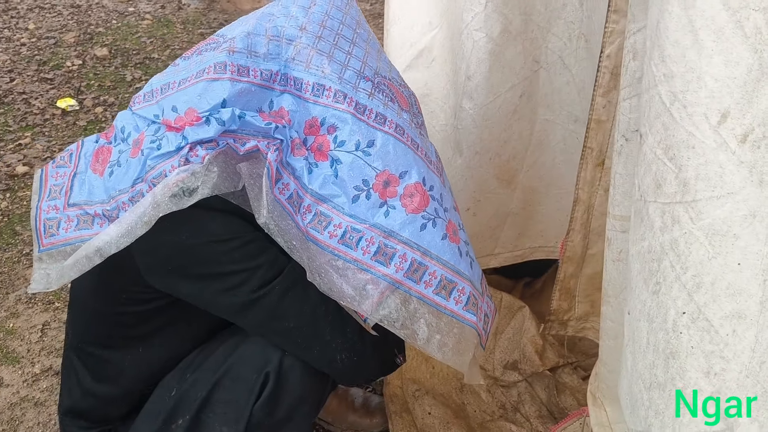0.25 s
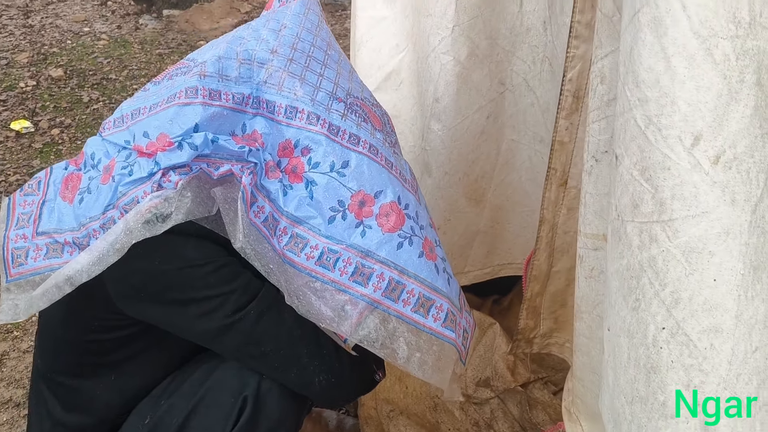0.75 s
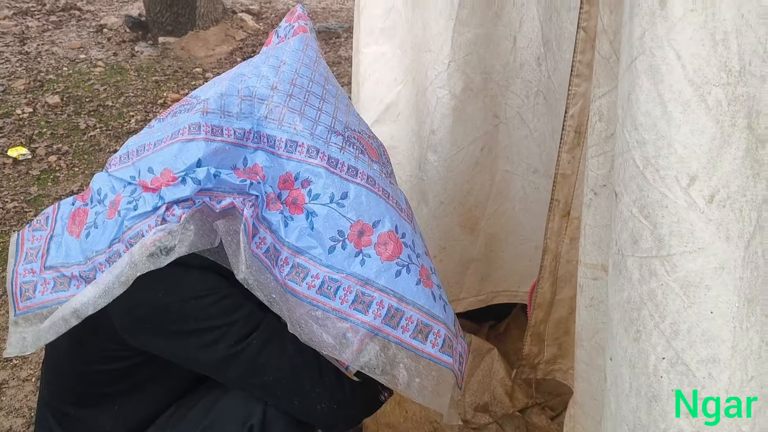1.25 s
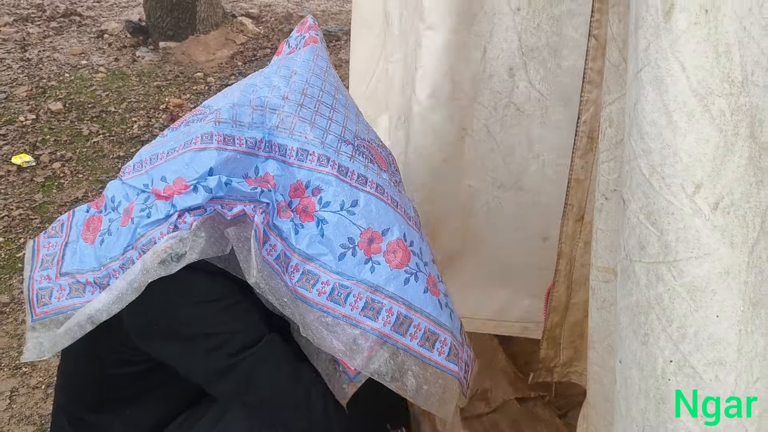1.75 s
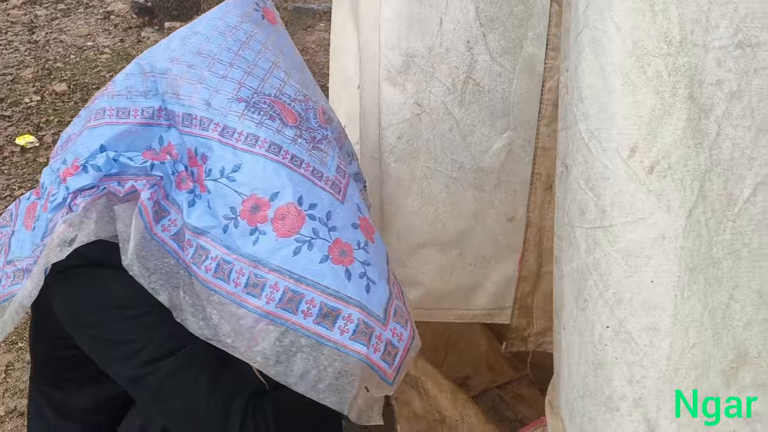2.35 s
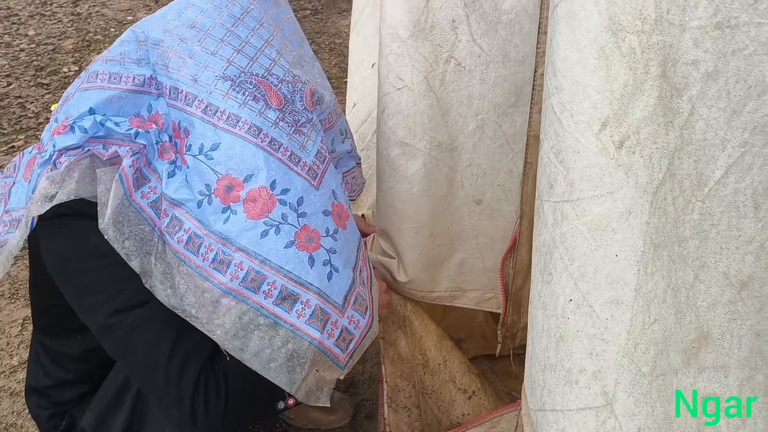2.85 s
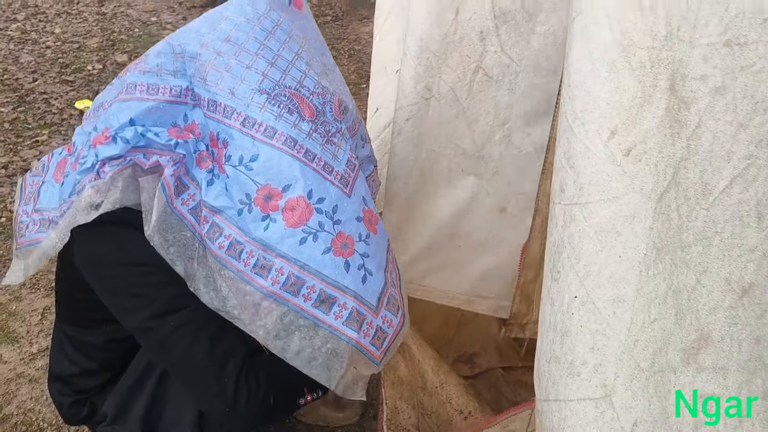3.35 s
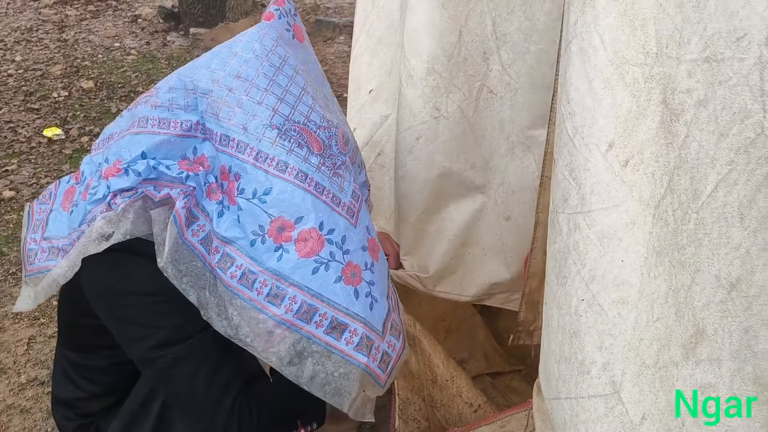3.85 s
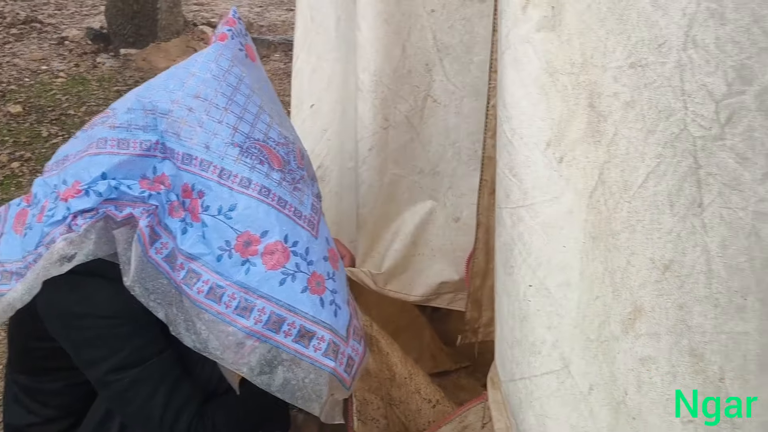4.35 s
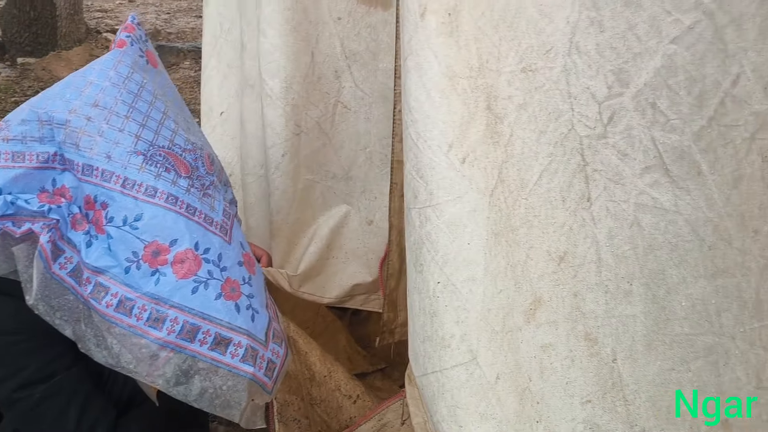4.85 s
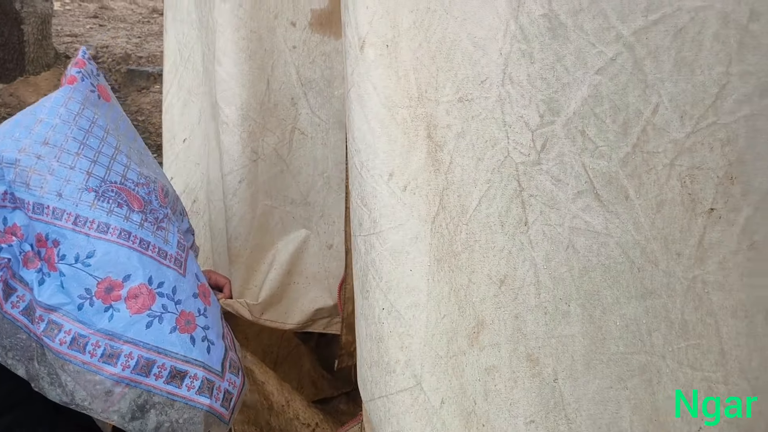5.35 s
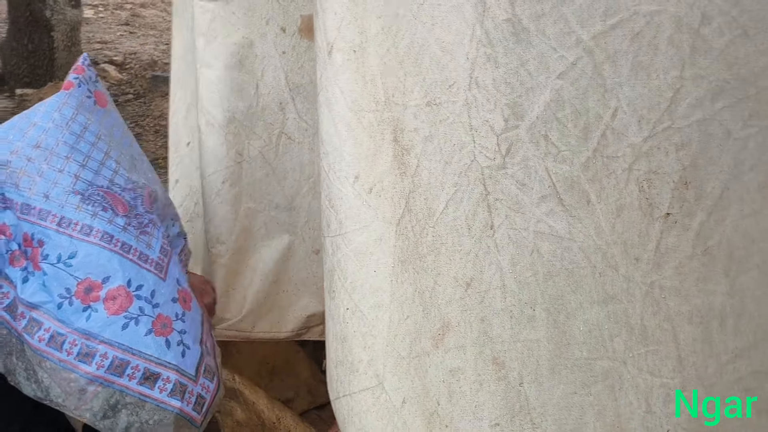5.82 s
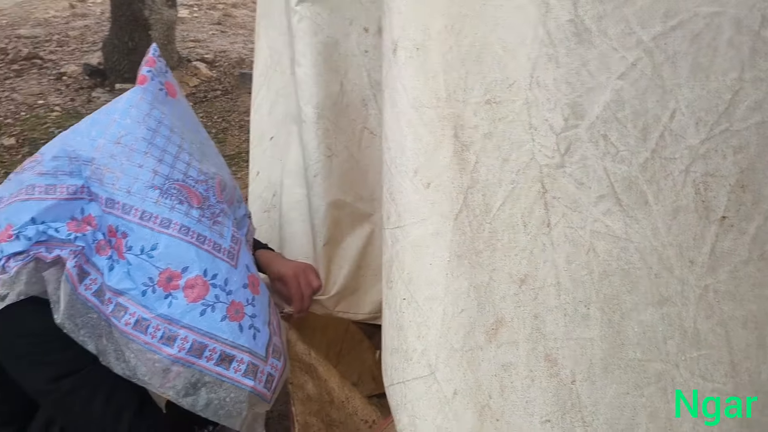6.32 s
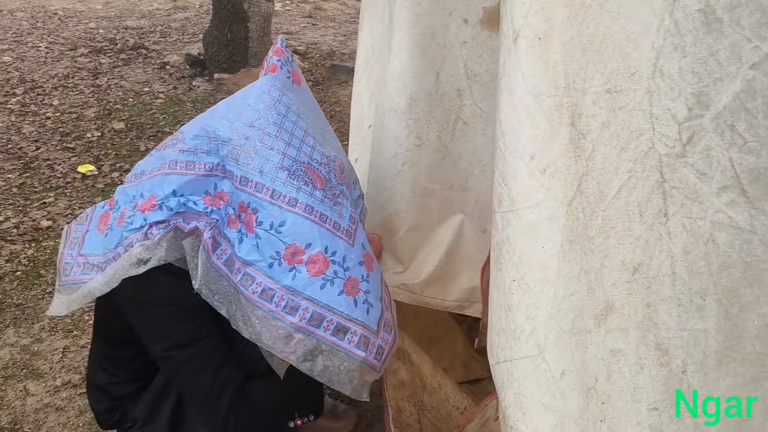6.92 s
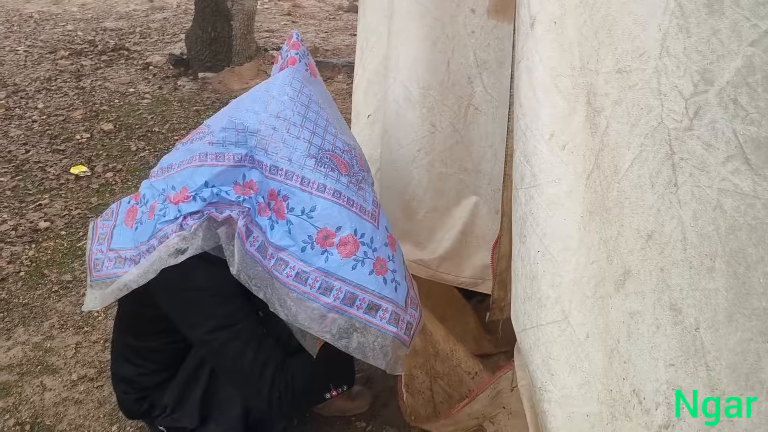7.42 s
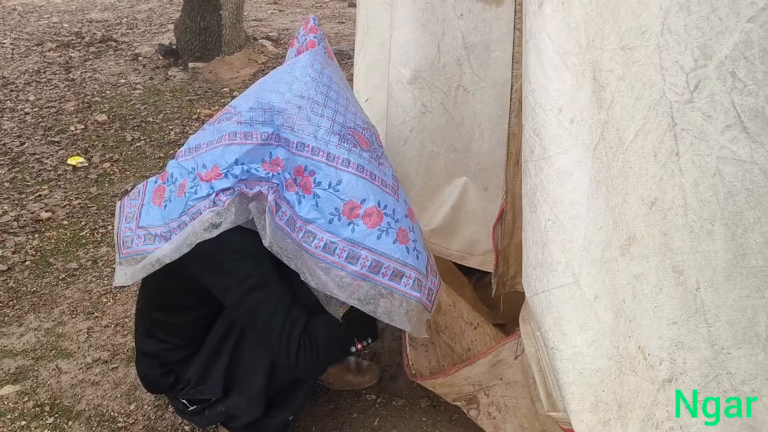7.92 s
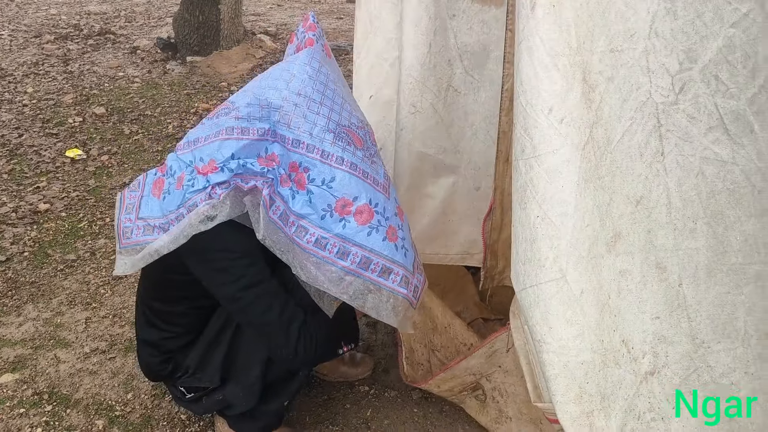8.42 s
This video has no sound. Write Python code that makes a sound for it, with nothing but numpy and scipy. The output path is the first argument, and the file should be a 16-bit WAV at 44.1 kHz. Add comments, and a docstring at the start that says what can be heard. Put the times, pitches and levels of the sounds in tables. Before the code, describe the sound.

Close, irregular raindrops tap on tent canvas and a plastic sheet over a fine patter, soft swishes and light wind.

```python
"""Rain on a canvas tent

Close under the canvas and a plastic sheet, on a microphone with two unlike ports. Heavy drops
thump the cloth and splash, others tick on the plastic, and small ones patter all around.
The sheet swishes as it slides, handled cloth rumbles, and rain hisses in the distance.
A few heavy drops boom low, and light wind buffets the microphone, both mostly on the left."""
import sys
import numpy as np
from scipy import signal
from scipy.fft import rfft, irfft
from scipy.io import wavfile

SR = 44100
rng = np.random.default_rng(int(sys.argv[2]) if len(sys.argv) > 2 else 0)


def to_wav(s):
    """Save 16-bit WAV."""
    ch = np.atleast_2d(s).T  # columns
    pcm = np.round(np.clip(ch, -1, 1) * 32767)  # PCM
    wavfile.write(sys.argv[1], SR, pcm.astype(np.int16))


N = 382788

# Heavy drops on the canvas, close to the microphone.
# start_s, thump_db, pitch_hz, snap_db, spray_db, pan_db (positive is left)
CANVAS_DROPS = [(0.069, -14.5, 306, -22, -33, 1.5), (0.2934, -30.5, 204, -38, -57, -1),
                (0.39, -25.5, 420, -30.5, -37, -1), (0.395, -26, 356, -41, -50, 2),
                (0.418, -38, 376, -25, -33, 8), (0.4281, -29, 380, -31, -43, -1),
                (0.5378, -25, 450, -37, -53, -2), (0.803, -32, 544, -32, -42, -2),
                (0.836, -30, 413, -31, -50, 0), (0.9134, -18, 472, -21.5, -34, 0),
                (0.926, -28.5, 186, -40, -24, 1.5), (1.0463, -15.5, 318, -21, -33, 1.5),
                (1.272, -18, 364, -37, -45, 1), (1.288, -27, 300, -30, -47, 3),
                (1.3172, -22.5, 300, -23.5, -43, -1.5), (1.4472, -26.5, 570, -30.5, -48, 3),
                (1.454, -27, 343, -42, -37, 1), (1.513, -31, 280, -48, -42, -1),
                (1.702, -13, 313, -22, -39, 4), (1.752, -29, 251, -43, -50, 2),
                (1.766, -16, 270, -24, -25.5, 10.5), (1.8419, -17.5, 395, -15, -38, 10),
                (1.8726, -13.5, 270, -18.5, -36, 8), (1.956, -12, 295, -18, -32.5, 6.5),
                (1.9634, -18.5, 409, -21.5, -45, 7), (2.073, -24.5, 360, -33, -41, 2),
                (2.1296, -25, 384, -25.5, -39, -3), (2.18, -10.5, 278, -25.5, -31, 2.5),
                (2.242, -35, 300, -34, -55, -4), (2.4159, -28, 473, -37, -55, 2),
                (2.6397, -29.5, 464, -35, -48, 1), (3.5175, -22, 434, -24, -34, -1.5),
                (3.6588, -21, 277, -24, -51, 0), (4.3429, -25, 372, -24.5, -28, 3.5),
                (4.6224, -11, 380, -20.5, -27, 3.5), (5.011, -28, 434, -36, -37, 1),
                (5.1898, -17, 305, -21.5, -31, 2), (5.2225, -25.5, 213, -21, -34, -1.5),
                (5.2282, -29, 203, -28, -39, 4), (5.2913, -24, 387, -20.5, -30, 5.5),
                (5.418, -28.5, 300, -44, -42, 0), (5.4692, -21.5, 480, -39, -39, 4),
                (5.6731, -31, 300, -30, -35, 5), (5.8589, -31, 350, -43, -44, -2),
                (6.0199, -11.5, 335, -20.5, -30, 2.5), (6.4418, -29, 400, -39, -40, -3),
                (6.592, -24, 282, -30.5, -44, 2), (7.0748, -27, 580, -29, -36, 4),
                (7.2006, -28, 231, -20.5, -32, 5), (7.332, -25.5, 291, -31.5, -39, -1),
                (7.6402, -23.5, 473, -55, -42, 2), (7.662, -35.5, 220, -36, -48, 12),
                (7.6962, -30, 275, -33, -37, 5), (7.951, -22, 288, -29.5, -40, 2),
                (8.5848, -32.5, 362, -31.5, -40, -1)]
def canvas_drops(rows=CANVAS_DROPS):
    """Drops thump the cloth and splash briefly; the knock's level follows both snap and thump."""
    return strike([(s, thump, hz, snap + 0.21 * (thump - snap) - 1.0, snap, spray, pan)
                   for s, thump, hz, snap, spray, pan in rows], splash_t60_s=0.0099)

# Soft pats on the same canvas. start_s, thump_db, pitch_hz, pan_db
SOFT_PATS = [(0.191, -27, 300, -1), (0.262, -31, 300, -1), (0.543, -28, 300, -2), (1.066, -28, 320, 4),
             (1.492, -25.5, 455, 3), (1.632, -27, 203, 1), (1.653, -23.5, 170, -1.5), (1.919, -33, 278, -2),
             (1.942, -22, 360, 0), (2.9411, -27, 373, 1), (2.946, -33, 403, 1), (2.969, -40, 400, -2),
             (2.983, -33, 129, 15), (3.067, -41, 150, 8), (3.212, -27, 525, 4), (3.2167, -25, 257, 1),
             (3.3682, -32.5, 400, -1), (3.7412, -20, 440, .5), (3.7464, -24.5, 300, 0),
             (4.5106, -30.5, 248, -1), (4.525, -28, 460, 4), (4.736, -33, 352, 2), (4.79, -35, 258, -1),
             (4.843, -32.5, 482, -3), (5.047, -37.5, 138, 14), (5.087, -35, 400, 1), (5.497, -32, 260, 0),
             (5.562, -36, 198, 2), (6.0288, -24.5, 330, -2), (6.1966, -33, 229, -1), (6.302, -38.5, 380, 2),
             (6.37, -35.5, 300, 0), (7.1514, -27.5, 357, 2), (7.597, -33, 350, 0), (7.6455, -27, 420, 0),
             (7.707, -29, 300, -2), (7.83, -38, 300, -2)]
def soft_pats():
    """Drops that swing the cloth with next to no splash."""
    return canvas_drops([(s, db, hz, db - 29.5, db - 28, pan) for s, db, hz, pan in SOFT_PATS])

# Drops on the plastic sheet nearby. start_s, knock_db, snap_db, spray_db, pan_db
SHEET_TICKS = [(0.44,-33,-28,-47,-2),(0.4845,-48,-21,-27,-10),(0.488,-50,-14.5,-24.5,1),(0.945,-40,-28,-48,-2),(1.005,-39,-51,-39,2),(1.732,-56,-44,-38,5),(1.789,-42,-38,-32,15),(1.809,-36,-21,-37,15),
               (2.101,-32,-27,-37,4),(2.873,-51,-28.5,-37,0),(3.126,-46,-30.5,-42,3),(3.276,-30.5,-46,-36,2),(3.93,-32,-31,-42,-4),
               (3.976,-61,-37,-36,10),(4.314,-44,-30,-39,0),(4.709,-34.5,-31,-46,-3),(5.181,-33,-33,-45,0),(5.2802,-30,-28,-42,0),(5.981,-40,-34,-35,0),
               (6.429,-48,-44,-37,4),(6.651,-42,-38,-33.5,3),(6.699,-30.5,-47,-42,2),(7.892,-33,-33,-45,-4.5),(8.152,-37,-40,-37.5,0),
               (8.265,-31.5,-32,-50,-2),(8.386,-56,-37,-40,0),(8.525,-33,-33,-53,4),(8.493,-40,-32,-50,-3),(.986,-50,-46,-31.5,10),(1.105,-48,-40,-34,3),(1.0276,-45,-36,-43,-2),(1.5892,-26,-22.5,-31,10),
               (2.2613,-53,-43,-35.5,12),(2.3074,-31.5,-34,-48,-1),(2.4498,-30,-32,-54,1),(2.517,-28,-30,-40,-2),
               (2.598,-33,-33,-56,12),(2.686,-36,-32,-30,4),(2.7263,-53,-50,-32.5,8),(2.9196,-52,-37,-29.5,4),
               (3.0158,-35,-34,-35,1),(3.066,-54,-28.5,-41,3),(3.2499,-32.5,-34.5,-50,-1),(3.259,-51,-39,-37,0),
               (3.3556,-35,-47,-34.5,15),(3.449,-31,-38,-33,5),(3.833,-31,-31,-47,-4),(3.9482,-31,-31.5,-48,-4),(4.077,-28.5,-30,-40,0),
               (4.1085,-33,-27.5,-35,2),(4.433,-32.5,-23.5,-33,1),(4.592,-30,-34,-48,3),(4.7626,-45,-32,-25,1),
               (4.7722,-34,-32,-37,5),(4.961,-31.5,-34,-47,-10),(5.1201,-32.5,-36,-42,-5),(5.3297,-30,-29,-42,5),
               (5.5853,-31.5,-36,-42,0),(5.65,-34,-32,-35,0),(5.6873,-35,-34,-44,3),(6.1362,-29,-31,-51,0),(6.3172,-56,-32,-36,5),
               (6.5051,-35,-33,-32,6),(6.52,-33,-38,-34,1),(6.925,-34,-41,-48,9),(7.069,-40,-28,-39,3),(7.081,-41,-31,-42,3),(7.143,-45,-40,-36.5,0),(7.2214,-34,-27.5,-44,2),(7.386,-50,-42,-39,2),(7.2766,-32,-37,-39,-3),
               (7.7828,-41,-29,-32,8),(8.188,-32.5,-32.5,-42,-4),(8.3687,-37,-40,-35,2),(8.4594,-47.5,-53,-27.5,6),
               (8.6193,-32,-48,-37.5,-5)]
def sheet_ticks(thump_hz=300):
    """On plastic a drop is nearly all splash, over a faint thump."""
    return strike([(s, knock - 11, thump_hz, knock, snap, spray, pan)
                   for s, knock, snap, spray, pan in SHEET_TICKS], splash_t60_s=0.015)

def strike(drops, splash_t60_s):
    """Each drop swings three membrane modes, alike at both ports, and splashes noise, unlike at each."""
    size = SR // 8
    t = np.arange(size) / SR
    click, left_right = (t == 0) * 1.0, np.array([[0.5], [-0.5]])
    dying = from_db(-60 * t / splash_t60_s) + 0.16 * from_db(-60 * t / 0.067)   # droplets trail after
    opening = 1 - np.exp(-t / (0.035 * splash_t60_s + 1e-5))
    crack = (3.0 - 120 * splash_t60_s) * np.array([0.7, 0.9, 1.4])[:, None, None]   # hard contact
    envelope = dying * opening + crack * from_db(-60 * t / 0.0013)
    thumps, splashes = np.zeros((2, N + size)), np.zeros((3, 2, N + size))
    for start_s, thump_db, hz, knock_db, snap_db, spray_db, pan_db in drops:
        at = slice(round(start_s * SR), round(start_s * SR) + size)
        cycles = 5.0 - 0.13 * max(thump_db, -40)   # hard blows damp themselves, soft pats ring on
        swing = 0.99 * ring(click, hz, t60_s=cycles / hz)
        swing += 0.22 * ring(click, 0.588 * hz, t60_s=0.067)
        swing += 0.5 * ring(click, 1.365 * hz, t60_s=0.47 * cycles / hz)
        # light drops and those with little splash land softer
        contact_hz = 3600 * from_db(0.12 * (thump_db + 15) + 0.25 * min(snap_db - thump_db, 0))
        swing = 1.18 * soften(soften(swing, contact_hz), contact_hz)
        thumps[:, at] += from_db(thump_db + left_right * pan_db) * swing
        splash = envelope * rng.standard_normal((3, 2, size)) + 2.0 * crack * click
        splash *= from_db(0.62 * left_right * pan_db)
        splashes[:, :, at] += from_db([knock_db, snap_db, spray_db])[:, None, None] * splash
    splashes[0] = 1.275 * band(splashes[0], 1080, 3260, order=1)   # the knock sits well above the thump
    rebound = band(soften(thumps, hz=2200), 44, 8000, order=1)   # open cloth radiates no steady push
    return (rebound + in_bands(splashes))[:, :N]

def patter(slide_db, band_levels_db=(-53.5, -55, -60.5)):
    """Small drops all around, as tiny bursts of noise; a sliding sheet crackles with them."""
    sharp = bursts(per_s=450, spread_db=2.8, t60_s=0.0036)   # these sound in all bands at once
    sides = from_db(3.33 * np.array([drift(27), drift(39)]))   # drops fall nearer one port or the other
    gates = []
    for db in band_levels_db:
        soft = bursts(per_s=400, spread_db=2.5, t60_s=0.0067)
        gates.append(from_db(db + 0.29 * slide_db) * (1.15 * sharp + 0.84 * soft))
    return in_bands([gate * sides * rng.standard_normal((2, N)) for gate in gates])

# The tent cloth is handled near the microphone. peak_s, level_db, rise_s, fall_s
CLOTH_MOVES = [(0.2, -49.5, 0.23, 0.11), (0.43, -41, 0.033, 0.027), (1.0, -46.5, 0.57, 0.17),
               (1.55, -39.5, 0.14, 0.22), (1.76, -32.5, 0.29, 0.24), (2.95, -46, 0.38, 0.12),
               (3.25, -46, 0.077, 0.093), (3.65, -45.5, 0.37, 0.25), (4.56, -43.5, 0.11, 0.3),
               (5.26, -41.5, 0.091, 0.31), (6.02, -43.5, 0.053, .12), (6.61, -44.5, .05, 0.058),
               (7.28, -42, 0.26, 0.14), (7.67, -39.5, 0.042, 0.056), (7.97, -43.5, 0.14, .08),
               (8.3, -45.5, 0.1, 0.42)]
def cloth_rumble(rest_db=-50.5):
    """Clumps of soft blows, denser and deeper when handled, each strike a few low canvas modes."""
    handled_db = swells(CLOTH_MOVES, rest_db) - rest_db
    blows = impacts(per_s=170 * from_db(3.0 * drift(23) + 0.6 * handled_db), spread_db=2.5)
    sides = from_db(rng.normal(0, 2.3, (2, N)))
    modes = np.zeros((2, N))
    for hz in np.geomspace(130, 950, 12):
        struck = blows * sides * (rng.random(N) < 0.3)
        modes += from_db(-0.3 * handled_db * np.log2(hz / 250)) * ring(struck, hz, t60_s=15.5 / hz)
    rumble = rms_one(band(soften(modes, hz=910), 300, 810, order=1))
    return from_db(rest_db + 0.68 * handled_db) * rumble   # denser blows add to this swell

# The plastic sheet slides, close by. peak_s, swish_db, fine_hiss_db, rise_s, fall_s
SHEET_SLIDES = [(.15,-48.5,-61,.25,0.23),(.42,-42,-48,0.059,0.049),(.85,-44,-50.5,0.23,0.12),(1.24,-40,-50,0.15,0.13),(1.54,-41.5,-56,0.067,0.26),
                (1.84,-49,-42,0.38,0.075),(3.5,-47,-56,0.17,0.15),(4.0,-51,-54,0.3,0.15),
                (5.02,-47,-46.5,0.046,0.053),(5.26,-51,-51.5,0.088,0.36),(6.02,-46,-53,0.068,0.04),(6.51,-60,-53,0.028,0.38),
                (7.69,-46,-49.5,0.033,0.033),(7.96,-52,-52,0.059,0.14),(8.47,-49,-52.5,0.22,0.33)]
def sheet_and_far_rain(far_rain_db=(-51, -49, -58)):
    """Flickering hiss of far rain that swells as the sheet slides; also gives the top band's rise in dB."""
    peak_s, swish_db, fine_db, rise_s, fall_s = np.transpose(SHEET_SLIDES)
    levels_db = [swells(zip(peak_s, db, rise_s, fall_s), rest_db)
                 for db, rest_db in zip([swish_db - 5, swish_db, fine_db], far_rain_db)]
    flicker_db = 1.6 * drift(22)
    noises = [from_db(db + flicker_db + 1.8 * drift(40)) * rng.standard_normal((2, N))
              for db in levels_db]
    return in_bands(noises), levels_db[2] - far_rain_db[2]

# Low swells: the boom of heavy drops on the canvas (short), and light wind on the microphone (long).
# peak_s, level_db, rise_s, fall_s
LOW_SWELLS = [(0.07, -37, 0.011, 0.021), (1.72, -50.5, 0.05, 0.29), (2.19, -44, 0.058, 0.06),
              (2.45, -42, 0.27, 0.19), (2.9, -41, 0.11, 0.41), (4.25, -43.5, 0.16, 0.42),
              (5.22, -44.5, 0.35, 0.2), (5.73, -44.5, .5, 0.29), (6.62, -38, .03, 0.037),
              (7.66, -40, 0.068, 0.039), (8.58, -43.5, 0.16, 0.13)]
def boom_and_wind(calm_db=-59.5):
    """Booming canvas and buffeting air: lumpy low noise, its own at each port, stronger on the left."""
    lumps = from_db(4.4 * np.array([drift(7.4), drift(13)]))
    low_noise = rms_one(lumps * band(rng.standard_normal((2, N)), 49, 132))
    return from_db(swells(LOW_SWELLS, calm_db) + np.array([[3.0], [-6.0]])) * low_noise

# The three bands of splash and hiss: knock, snap, spray. low_hz, high_hz
SPLASH_BANDS = [(700, 3500), (3500, 7800), (7800, 19000)]
def in_bands(parts, port_loss_db=(1, -1.5, 12)):
    """Confines three white signals to their bands, making up for what band and ports take away."""
    knock = parts[0] + 0.088 * parts[0][::-1]   # each port hears a little of the other's knock
    return sum(from_db(db) * np.sqrt(SR / 2 / (high - low)) * band(x, low, high, order=3)
               for x, (low, high), db in zip([knock, *parts[1:]], SPLASH_BANDS, port_loss_db))

def ring(clicks, hz, t60_s):
    """A click pushes a membrane mode out at once; it swings back and dies."""
    r, w = from_db(-60 / (t60_s * SR)), 2 * np.pi * hz / SR
    return signal.lfilter([1, -r * np.cos(w)], [1, -2 * r * np.cos(w), r * r], clicks + 1e-18)

def soften(x, hz):
    """One-pole low-pass: a soft contact."""
    r = np.exp(-2 * np.pi * hz / SR)
    return signal.lfilter([1 - r], [1, -r], x)

def impacts(per_s, spread_db):
    """Random clicks: many small, few large."""
    sizes = from_db(spread_db * np.minimum(rng.exponential(1, N), 3.0))
    return sizes * (rng.random(N) < per_s / SR)

def bursts(per_s, spread_db, t60_s):
    """Envelope of small drops, each a short decay; rms 1."""
    return rms_one(signal.lfilter([1], [1, -from_db(-60 / (t60_s * SR))], impacts(per_s, spread_db)))

def swells(rows, rest_db):
    """Level in dB over a resting floor; a swell gains 7.84 dB per rise_s and loses it per fall_s."""
    t = np.arange(0, N, 64) / SR
    power = from_db(2 * rest_db)
    for peak_s, db, rise_s, fall_s in rows:
        below_peak_db = 7.84 * np.maximum((peak_s - t) / rise_s, (t - peak_s) / fall_s)
        power = power + from_db(2 * (db - below_peak_db))
    return np.interp(np.arange(N) / SR, t, 10 * np.log10(power))

def drift(hz):
    """Slow random wander: noise through a double one-pole low-pass, rms 1."""
    step, settle = 40, 2000
    r = np.exp(-2 * np.pi * hz * step / SR)
    slow = signal.lfilter([1], [1, -2 * r, r * r], rng.standard_normal(N // step + settle + 2))[settle:]
    return np.interp(np.arange(N) / step, np.arange(len(slow)), rms_one(slow))

def band(x, low_hz, high_hz, order=2):
    """Butterworth band-pass."""
    return signal.sosfilt(signal.butter(order, [low_hz, high_hz], "band", fs=SR, output="sos"), x)

def from_db(db):
    """Gain of a level in dB."""
    return 10 ** (np.asarray(db) / 20)

def rms_one(x):
    """Scaled to rms 1."""
    return x / np.sqrt(np.mean(x ** 2) + 1e-20)

def scene():
    """Everything that arrives in front of the two ports."""
    drops = canvas_drops() + soft_pats() + sheet_ticks()
    hiss, slide_db = sheet_and_far_rain()
    return drops + patter(slide_db) + cloth_rumble() + hiss + boom_and_wind()

def port(x, response):
    """A microphone port colours the sound as a minimum-phase filter."""
    size = 4096
    hz = np.maximum(np.arange(size // 2 + 1) * SR / size, 1)
    points_hz, gains_db = np.transpose(response)
    curve_db = np.interp(np.log(hz), np.log(points_hz), gains_db)
    cepstrum = irfft(curve_db * np.log(10) / 20)
    cepstrum[1:size // 2] *= 2
    cepstrum[size // 2 + 1:] = 0
    return signal.fftconvolve(x, irfft(np.exp(rfft(cepstrum))))[:N]

# The microphone's ports, the left duller, the right brighter. frequency_hz, gain_db
LEFT_RESPONSE = [(40, -12), (90, 5.5), (700, 0.5), (1500, -4.5), (2400, -6.5), (5000, -5), (6500, -9),
                 (7000, -11.5), (7800, -12), (8300, -4), (8900, -11.5), (10800, -13.5), (13500, -15),
                 (15000, -14)]
RIGHT_RESPONSE = [(40, -15.5), (90, 5), (700, 0.5), (1700, 2.5), (3900, 3.5), (5200, 6.5), (6000, 6.5),
                  (6700, 4.5), (7300, -1.5), (8100, -12), (8900, -21.5), (10700, -10), (13500, -11.5),
                  (15000, -6)]
def record(dry):
    """Each port colours its side, the right hears a little later, and the top treble is cut."""
    lag_samples, cutoff_hz = 9, 16050   # most drops land nearer the left port
    left = port(dry[0], LEFT_RESPONSE)
    right = port(np.pad(dry[1], (lag_samples, 0)), RIGHT_RESPONSE)
    return signal.sosfilt(signal.cheby2(24, 60, cutoff_hz, fs=SR, output="sos"), [left, right])

dry = scene()
out = record(dry)
to_wav(out)
```